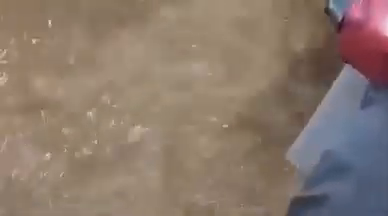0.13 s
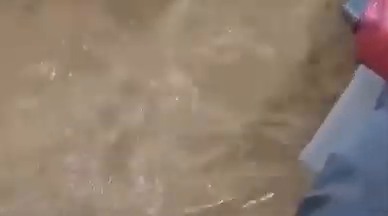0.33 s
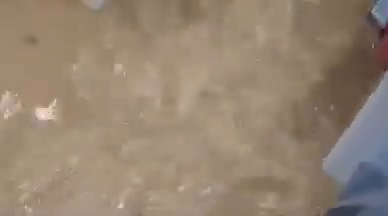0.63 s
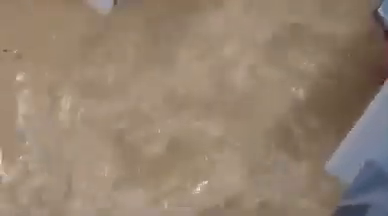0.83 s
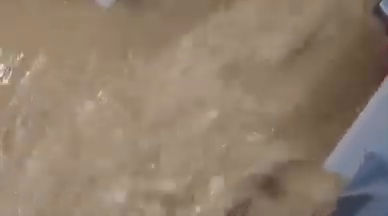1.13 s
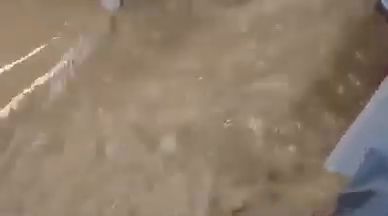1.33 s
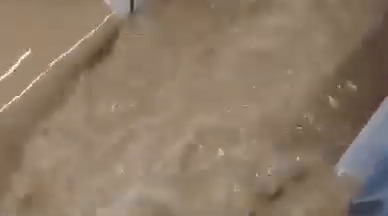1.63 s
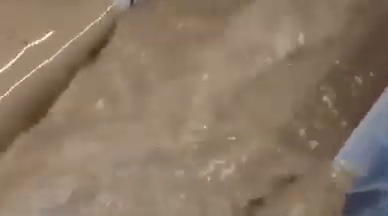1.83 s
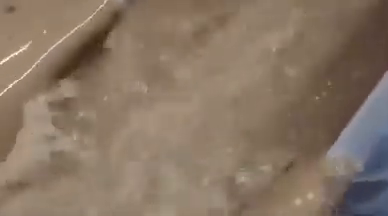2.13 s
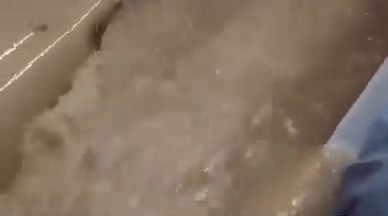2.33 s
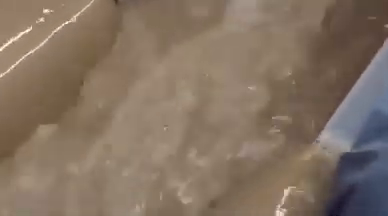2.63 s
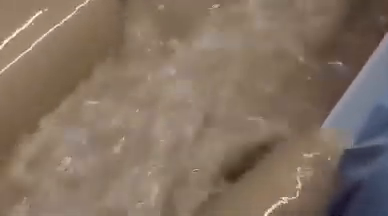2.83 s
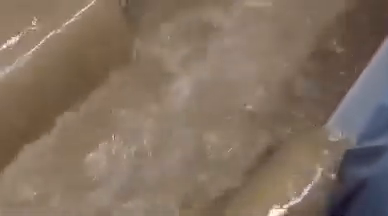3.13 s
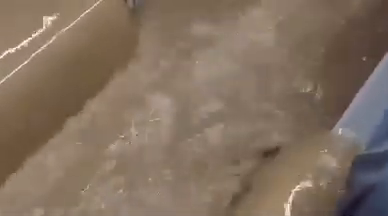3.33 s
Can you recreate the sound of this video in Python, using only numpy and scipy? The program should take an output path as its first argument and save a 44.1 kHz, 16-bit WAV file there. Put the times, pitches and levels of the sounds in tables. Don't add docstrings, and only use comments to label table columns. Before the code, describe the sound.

Close, mono phone sound from a vehicle on a flooded road: churning water with gulps and spray, a deep engine throb that slows then steadies, dull knocks, faint panel buzz and thin late squeals.

```python
import sys
import numpy as np
from scipy import signal
from scipy.fft import rfft, irfft
from scipy.io import wavfile
from scipy.ndimage import uniform_filter1d

SR = 44100
rng = np.random.default_rng(int(sys.argv[2]) if len(sys.argv) > 2 else 0)


def nominal_scale(level):
    x = np.asarray(level, float) / 20
    return 10 ** x


def log_audio(samples):
    frames = np.atleast_2d(samples).T
    limited = np.clip(frames, -1, 1)
    pcm = np.round(limited * 32767).astype(np.int16)
    wavfile.write(sys.argv[1], SR, pcm)


N = 153468
T = np.arange(N) / SR


def level(x, db):
    return x * nominal_scale(db) / np.sqrt(np.mean(x ** 2))


def curve(table, column):
    rows = np.array(table, float)
    return np.interp(T, rows[:, 0], rows[:, column])


def walk(rate_hz):
    hold = int(SR / rate_hz)
    steps = np.repeat(rng.standard_normal(N // hold + 1), hold)
    smooth = uniform_filter1d(uniform_filter1d(steps, hold), hold)
    return 1.296 * smooth[:N]


def noise_band(hz, width):
    edge = 1 + width / 2
    limits = [hz / edge, min(hz * edge, 0.45 * SR)]
    sos = signal.butter(2, limits, "band", fs=SR, output="sos")
    return signal.sosfilt(sos, rng.standard_normal(N))


def coloured_noise(spectrum, lowest_hz, move_db):
    points = np.array(spectrum, float)
    count, out = 16, 0
    for k in range(count):
        hz = lowest_hz * 2 ** (k / 3)
        db_per_hz = np.interp(np.log(hz), np.log(points[:, 0]), points[:, 1])
        band_db = db_per_hz + 10 * np.log10(hz)
        out = out + level(noise_band(hz, 0.26), band_db) * nominal_scale(move_db(k / count))
    return level(out, 0)


def tones(table, wobble_hz, flutter_db, edge_s):
    out = 0
    for start, length, hz, db in table:
        phase = 2 * np.pi * np.cumsum(hz + wobble_hz * walk(14)) / SR
        loudness = np.sqrt(2) * nominal_scale(db + flutter_db * walk(18))
        fade = np.clip(np.minimum(T - start, start + length - T) / edge_s, 0, 1) ** 2
        out = out + loudness * fade * np.sin(phase)
    return out


def ring(hz, t60_s, rise_s, glide):
    t = np.arange(int(t60_s * SR)) / SR
    envelope = (1 - np.exp(-t / rise_s)) * nominal_scale(-60 * t / t60_s)
    return envelope * np.sin(2 * np.pi * hz * (t + glide * t ** 2 / t60_s))


def add_at(track, start, sound):
    track[start:start + len(sound)] += sound


# time in seconds, half the firing rate in Hz,
# level of the firing tone in dB, level of its second overtone in dB.
ENGINE_RUN = [(0.0, 33.9, -15, -19), (0.2, 32.9, -23, -20), (0.42, 32.1, -18, -23), (0.56, 31.7, -22, -23),
              (0.75, 31.1, -18, -24), (1.0, 30.4, -16, -33), (1.2, 30.0, -17, -24), (1.42, 29.7, -17, -24),
              (1.55, 29.4, -29, -24), (1.74, 28.9, -23, -23), (1.84, 28.6, -14, -23),
              (1.94, 28.75, -15, -34), (2.08, 28.85, -19, -21), (2.22, 28.3, -11.5, -30),
              (2.5, 28.4, -14, -33), (2.8, 28.95, -13.5, -34), (3.35, 29.05, -15, -33),
              (3.48, 29.1, -19, -33)]
# order (multiple of the engine cycle), # starting
# level in dB, change in dB per second until settle_s, change in dB per second after.
UNEVEN_ORDERS = [(3, -36, -6, -5.5), (7, -38, 4, -1), (8, -39.5, 3.5, -2), (9, -26.5, 1, 1),
                 (10, -22, -9.5, -3.5), (13, -34, 3.5, -5), (15, -34, 6, -.5), (18, -33, -2.5, -1),
                 (21, -42, 1, 1), (24, -38, 4, -16), (27, -47, 1.5, 1.5), (30, -48, 1.5, 0.5),
                 (36, -49.5, 5, -0.5)]


def engine():
    settle_s = 1.576
    firing_flutter_db, flutter_db = 0.5, 1.3
    cycle_hz = (curve(ENGINE_RUN, column=1) + 0.07 * walk(6)) / 3
    cycle = 2 * np.pi * np.cumsum(cycle_hz) / SR

    def order_tone(order, db, flutter):
        loudness = np.sqrt(2) * nominal_scale(db + flutter * walk(12))
        offset = 0.6 * rng.uniform(-1, 1) + 0.2 * walk(2.94)
        return loudness * np.cos(order * cycle + offset)

    overtone_db = curve(ENGINE_RUN, column=3)
    out = order_tone(6, curve(ENGINE_RUN, column=2), firing_flutter_db)
    out += order_tone(12, overtone_db, firing_flutter_db)
    out += order_tone(34, overtone_db - 23.5, flutter_db)
    for order, db, sag_slope, late_slope in UNEVEN_ORDERS:
        sagging = sag_slope * np.minimum(T, settle_s)
        holding = late_slope * np.maximum(T - settle_s, 0)
        out += order_tone(order, db + sagging + holding, flutter_db)
    return out


# time in seconds, flow level in dB, spray brightness in dB.
WATER_FLOW = [(0.0, -27.5, 4), (0.06, -28, 0.7), (0.41, -26.5, 2.7), (0.48, -29, 1), (1.06, -23.5, 0),
              (1.11, -26.5, 3.3), (1.8, -24, -1.6), (1.94, -22, -1.4), (2.07, -26, 1.3), (2.11, -25.5, 2),
              (2.25, -25.7, 0), (2.68, -29.5, 0), (2.87, -27.3, -1.8), (3.42, -30.5, 1), (3.44, -29, -1.5),
              (3.48, -32, 0.5)]
# pitch in Hz, level in dB per Hz.
RUSH_COLOUR = [(180, -30), (300, -2.5), (519, -6), (716, -6), (1260, -7), (1490, -7), (2570, -14),
               (7470, -20), (8600, -25.5), (11200, -58.5), (18900, -120)]
# pitch in Hz, width as a fraction of the pitch, level in dB under the flow.
BODY_HOLLOWS = [
    (729, 0.21, -13),
    (1520, 0.17, -9.5),
    (4320, 0.12, -18.5),
]


def rush():
    swell, low, high = walk(8.9), walk(8.4), walk(8.8)

    def move_db(place):
        brightness = (0.7 * swell + curve(WATER_FLOW, column=2)) * place
        lean = 0.9 * ((1 - place) * low + place * high)
        flicker = 1.0 * walk(14)
        return brightness + lean + flicker

    out = coloured_noise(RUSH_COLOUR, 308, move_db)
    for hz, width, db in BODY_HOLLOWS:
        out = out + level(noise_band(hz, width), db) * nominal_scale(0.81 * walk(10.2))
    return nominal_scale(curve(WATER_FLOW, column=1)) * out


def small_bubbles():
    count = 900
    swarm = np.zeros(N + SR)
    starts = rng.uniform(0, N, count)
    pitches = rng.standard_normal(count)
    sizes = rng.exponential(1, count)
    for start, pitch, size in zip(starts, pitches, sizes):
        hz = 1450.6 * 2 ** (0.2973 * pitch)
        sound = ring(hz, t60_s=3 * 23.7 / hz, rise_s=2 / hz, glide=0.11)
        add_at(swarm, int(start), sound * nominal_scale(2.5 * min(size, 3)))
    return nominal_scale(curve(WATER_FLOW, column=1)) * level(swarm[:N], -10.5)


# start in seconds, pitch in Hz, level in dB.
LARGE_BUBBLES = [(.37, 880, -25), (.34, 1010, -28), (.38, 1440, -24), (0.909, 1430, -25),
                 (0.948, 900, -26.5), (1.025, 1500, -24), (1.53, 1600, -25), (1.81, 700, -26),
                 (1.92, 1680, -21), (1.95, 1520, -21), (2.098, 1530, -24.5), (2.185, 855, -23.5),
                 (2.9, 1780, -28), (2.969, 1620, -32), (3.165, 1370, -26), (3.045, 1510, -29),
                 (0.0, 740, -26), (0.327, 2350, -27), (0.335, 6400, -33), (0.232, 4450, -32),
                 (2.268, 420, -27), (2.268, 960, -28), (.13, 720, -28), (.17, 660, -28), (.295, 620, -28),
                 (.335, 1500, -26), (.36, 1620, -27), (.41, 1400, -27), (.45, 1580, -28), (.03, 750, -30),
                 (.62, 1500, -28), (.745, 1500, -29), (1.28, 380, -27), (1.35, 420, -28), (.25, 262, -28),
                 (1.68, 1450, -27), (.695, 1480, -27), (.84, 1600, -27), (1.04, 900, -28),
                 (2.02, 1330, -25), (2.005, 1560, -27), (2.075, 950, -28), (1.85, 1320, -27),
                 (2.42, 1630, -29), (1.885, 350, -25), (1.84, 270, -26), (2.6, 1330, -29),
                 (2.85, 1350, -28), (2.1, 400, -26), (3.432, 1470, -26.5)]


def gulps():
    out = np.zeros(N + SR)
    for start, hz, db in LARGE_BUBBLES:
        t60_s = 0.085 * min(1, (1500 / hz) ** 0.7)
        sound = ring(hz, t60_s, rise_s=0.0098, glide=0.025)
        add_at(out, int(start * SR), sound * nominal_scale(db + 10))
    return out[:N]


# pitch in Hz, level in dB per Hz.
RUMBLE_COLOUR = [(10, -14), (20, -8.5), (35, 4), (70, 1.5), (130, -4), (200, -11.5), (330, -15), (450, -28)]
# time in seconds, turbulence in dB.
BODY_BUFFET = [(0, -1), (.3, -3), (1.0, -2), (1.6, -2), (2.1, 0), (2.3, -6), (2.8, -9), (3.15, -8),
               (3.3, -4), (3.48, -3)]


def rumble():
    swing_db = curve(BODY_BUFFET, column=1)
    high_share = 0.28

    def move_db(place):
        return swing_db * (1 - (1 - high_share) * place ** 2) + 1.2 * walk(4.4)

    return nominal_scale(-24) * coloured_noise(RUMBLE_COLOUR, 11.11, move_db)


# start in seconds, length in seconds, pitch in Hz, level in dB.
PANEL_BUZZES = [
    (1.62, .42, 266, -31),
    (2.45, .8, 264, -41),
    (3.25, .35, 266, -35.5),
    (.05, 1.2, 345, -40),
    (1.05, .25, 280, -33),
    (.4, .3, 442, -39),
    (2.8, .6, 231, -40),
]


def panel_buzz():
    return tones(PANEL_BUZZES, wobble_hz=3.0, flutter_db=2.0, edge_s=0.07)


# start in seconds, centre pitch in Hz, level in dB, length in seconds.
SPRAY_BURSTS = [(0.108, 7420, -35.5, .025), (.222, 4330, -29.5, 0.02), (.18, 3500, -34, .025),
                (.255, 3500, -33, .015), (.255, 7300, -37, .015), (2.108, 5000, -33, .025),
                (2.108, 2700, -32, .02), (.62, 2000, -32, .03), (.97, 2200, -31, .05),
                (1.895, 7000, -38, .015), (.25, 5420, -33, 0.019), (0.324, 6440, -30, 0.018),
                (0.325, 4400, -30, 0.018), (.34, 1400, -32, 0.09), (.77, 2100, -33, 0.05),
                (.6, 2490, -34, .08), (0.56, 4500, -35, 0.058), (1.379, 3500, -33.5, .07),
                (2.2, 6000, -37, 0.14), (0.89, 1900, -33, 0.04), (1.038, 5000, -34, 0.041),
                (1.516, 6060, -37.5, 0.021), (1.669, 1550, -32, 0.053), (1.863, 3970, -38.5, 0.046),
                (1.881, 1600, -31, 0.045), (1.99, 1500, -30, 0.027), (2.073, 3500, -35, 0.06),
                (2.26, 1760, -31, .03), (2.84, 1300, -31.5, .04), (2.912, 3340, -40, 0.025),
                (3.141, 1500, -32.5, 0.022), (3.4, 5000, -47.5, 0.025)]


def splashes():
    out = 0
    for start, hz, db, length in SPRAY_BURSTS:
        u = np.clip(T - start, 0, None) / length
        burst = 2.3 * u * np.exp(-u ** 2)
        patches = nominal_scale(1.5 * walk(150))
        out = out + level(noise_band(hz, 0.56), db) * burst * patches
    return out


# start in seconds, pitch in Hz, level in dB.
FLOOR_KNOCKS = [
    (0.111, 31.8, -19),
    (1.58, 36, -20),
    (2.052, 85, -17),
    (.66, 100, -18),
    (.7, 140, -23),
]


def knocks():
    out = np.zeros(N + SR)
    for start, hz, db in FLOOR_KNOCKS:
        sound = ring(hz, t60_s=0.3, rise_s=0.04, glide=0)
        add_at(out, int(start * SR), sound * nominal_scale(db + 7.5))
    return out[:N]


# start in seconds, length in seconds, pitch in Hz, level in dB.
BRAKE_SQUEALS = [
    (1.99, .085, 1076, -33.5),
    (2.075, .215, 1076, -33.5),
    (3.025, .21, 1199, -34),
    (3.27, .075, 1225, -36),
    (3.335, .055, 1195, -37),
    (.7, .045, 6300, -40),
    (.15, .1, 1530, -37),
]


def brake():
    return tones(BRAKE_SQUEALS, wobble_hz=1.5, flutter_db=1.2, edge_s=0.012)


def scene():
    water = rush() + small_bubbles() + gulps() + splashes()
    body = rumble() + panel_buzz() + knocks()
    mix = engine() + water + body + brake()
    return mix[None, :]


def roll_off(x):
    return signal.sosfilt(signal.butter(12, 9070, fs=SR, output="sos"), x)


def record(dry):
    top_hz = 8680
    rounded = np.tanh(0.76 * dry) / 0.83
    spectrum = rfft(rounded, axis=1)
    hz = np.arange(spectrum.shape[1]) * SR / N
    mix = irfft(spectrum * (hz < top_hz), N, axis=1)
    return roll_off(mix)


dry = scene()
out = record(dry)
log_audio(out)
```